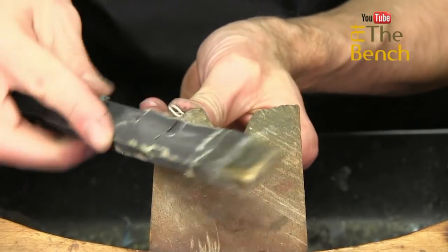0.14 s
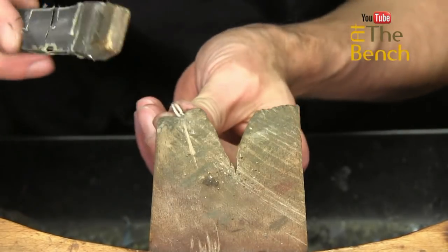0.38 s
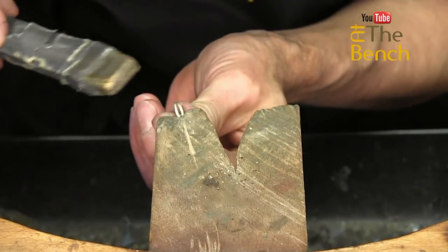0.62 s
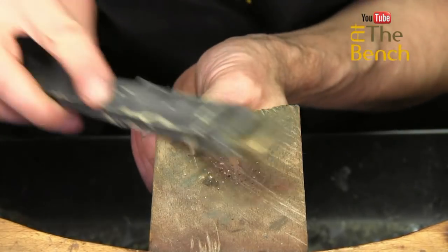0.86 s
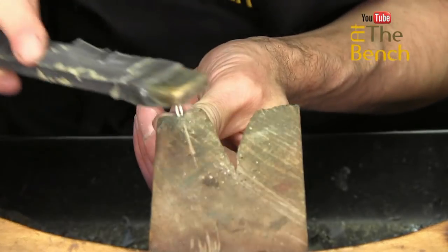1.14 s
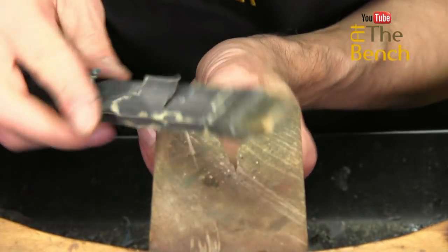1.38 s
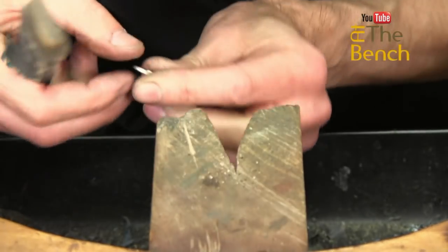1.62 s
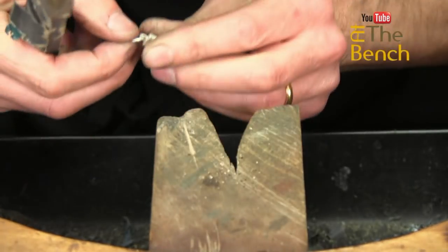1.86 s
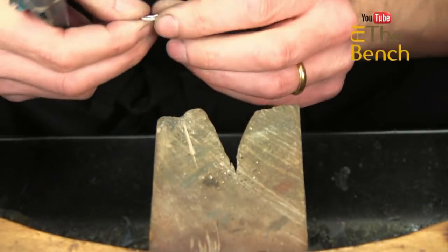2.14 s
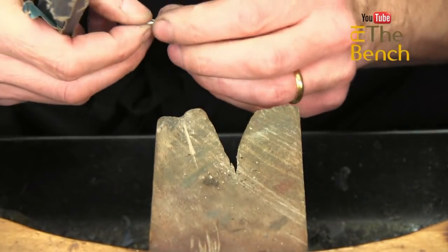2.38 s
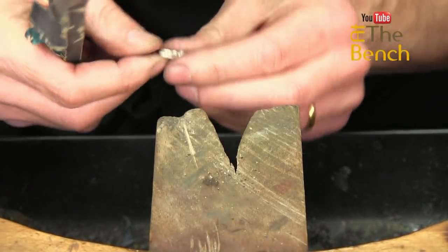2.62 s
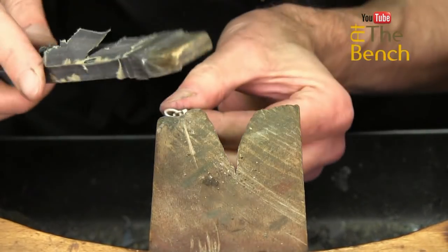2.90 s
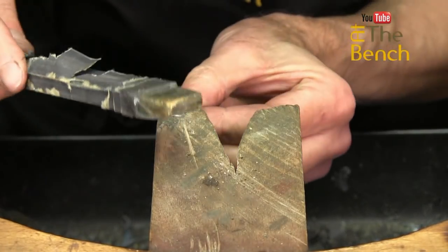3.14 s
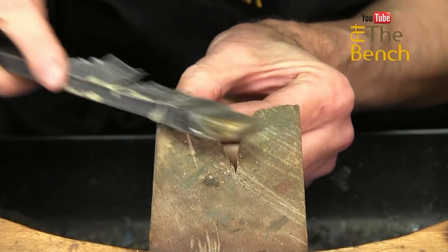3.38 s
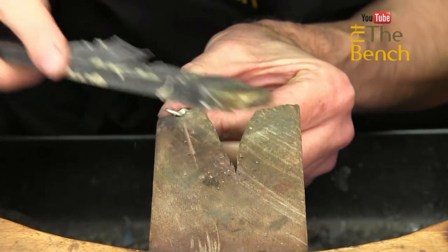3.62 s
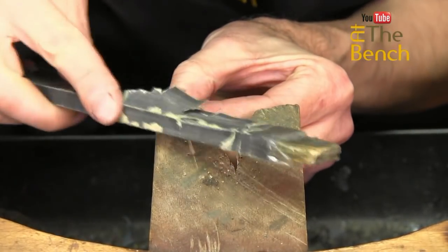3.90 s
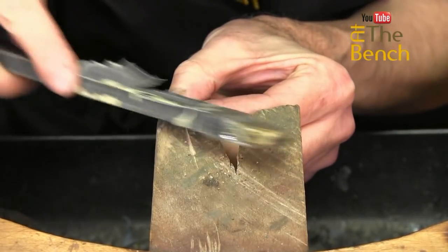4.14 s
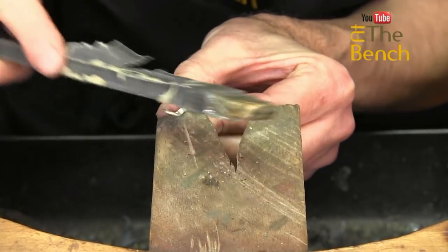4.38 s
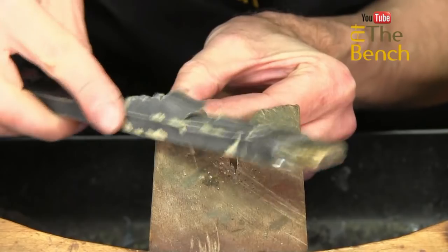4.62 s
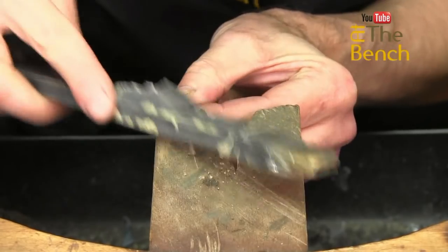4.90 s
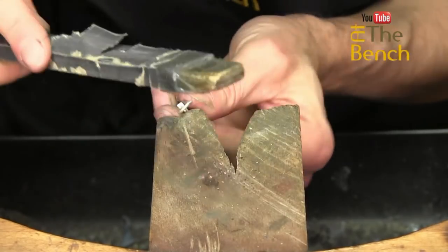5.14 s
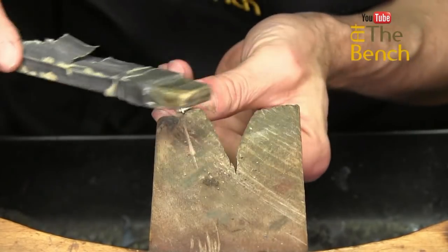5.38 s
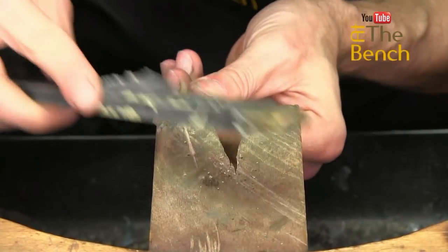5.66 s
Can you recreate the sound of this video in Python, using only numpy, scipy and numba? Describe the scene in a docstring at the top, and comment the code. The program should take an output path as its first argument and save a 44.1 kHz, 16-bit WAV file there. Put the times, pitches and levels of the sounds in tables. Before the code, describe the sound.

Dry, bright sandpaper hisses start almost at once, with woody knocks from the peg underneath and gaps between them. A quiet interval follows: skin rustles, little bumps on wood, sharp tiny clicks of metal. Then brisk back-and-forth rasping fills the rest, ringing slightly and shaking the wood. Single close microphone, small room, low steady background tone.

```python
"""At a bench in a small quiet workshop, one microphone: faint room tone throughout, rustling and bumping fingers first.
From 0.1 s a stick wrapped in abrasive paper is pushed over a small metal piece on a wooden peg:
knocks are struck wood modes with a noisy crack, strokes are clicking grit that hisses, rings and shakes the wood.
From 1.7 s fingers turn the piece over, with brushed-grain rustles, nudged wood and ticks of short rough ring.
From 3.5 s to the end the stick works again, with more knocks and slaps; a diffuse noise echo follows."""
import sys
import numpy as np
from scipy import signal
from scipy.fft import rfft, irfft
from scipy.io import wavfile
from numba import njit

SR = 44100
rng = np.random.default_rng(int(sys.argv[2]) if len(sys.argv) > 2 else 0)


def gain_from_db(level_db):
    """Turn a decibel level (scalar or array-like) into a linear amplitude factor."""
    decades = np.asarray(level_db, float) / 20
    return 10 ** decades


def digitize_waveform(pressure):
    """Quantize a signal to 16-bit integers and store it at the path in sys.argv[1].

    Rows of a 2-D input are taken as channels; values are limited to [-1, 1].
    """
    field = np.atleast_2d(pressure).T
    bounded = np.clip(field, -1, 1)
    quanta = np.round(bounded * 32767).astype(np.int16)
    wavfile.write(sys.argv[1], SR, quanta)


N = 254456

# room tone at the microphone, relative spectrum: (f/Hz, level/dB per Hz)
AIR_SPECTRUM = [(12, -44.5), (20, -1.5), (168, 0.5), (285, -10.5), (367, -8), (410, -8), (1090, -18),
                (1330, -21), (1480, -21.5), (2390, -23), (3440, -25), (13900, -29), (16000, -36)]
# skin and paper brushing: (start t/s, loudest t/s, end t/s, bright level/dB, dull part over bright level/dB)
RUSTLES = [(-.03, .0, 0.087, -61.5, 7.5), (.36, .39, 0.49, -50, -10), (.45, .52, 0.69, -56.5, -6.5),
           (.715, .755, 0.86, -54, -4), (.858, .878, 0.89, -60.5, 21.5), (1.08, 1.20, 1.32, -71, 17),
           (1.67, 1.72, 1.78, -58.5, -4), (1.775, 1.80, 1.93, -62, -3.5), (2.47, 2.50, 2.57, -68, -12),
           (2.70, 2.78, 2.83, -59, -6), (2.82, 2.965, 3.01, -47, -9), (3.0, 3.035, 3.17, -53.5, -14),
           (3.20, 3.265, 3.32, -54, -4.5)]
# relative spectrum of the bright rustle: (f/Hz, level/dB per Hz)
SKIN_SPECTRUM = [(1180, -34.5), (2000, -9), (3840, 2), (4150, 0.5), (8780, 3), (14500, -1.5), (16000, -18)]
# fingers bumping the wood: (start t/s, loudest t/s, end t/s, level/dB)
BUMPS = [(-.05, .03, .10, -61), (.74, .80, 0.82, -58.5), (1.12, 1.24, 1.3, -50), (1.78, 1.797, 1.8, -55),
         (2.07, 2.11, 2.174, -55), (2.19, 2.228, 2.30, -53.5), (3.07, 3.09, 3.13, -56),
         (3.11, 3.125, 3.15, -41), (3.24, 3.275, 3.4, -55.5)]
# modes of peg, stick and bench top: (f/Hz, level/dB, t60/s unless the contact damps it sooner)
WOOD_MODES = [(92.8, -17, 1), (145, -24.5, 0.94), (218.8, -3, 0.091), (280.1, -4.5, 0.12),
              (316.7, -2.5, 0.089), (348, -23, 1), (418, -8, 0.12), (503, -2.5, 0.04), (521.6, -9, 0.27),
              (684, -1.5, 0.032), (759, -11.5, 0.041), (910, -13, 0.14), (1100, -9, 0.17), (1140, -9, 0.23),
              (1337, -12, 0.13), (1774, -11, 0.035), (2261, -17.5, .03)]
# jointed wood splits each mode into close rings: (offset/share of f)
MODE_SPLIT = [-0.0235, 0, 0.0311]
# echo of the workshop: (f/Hz, t60/s, level/dB)
ROOM_ECHO = [(100, 0.88, -4), (400, 0.29, -10.5), (1420, 0.51, -4.5), (4900, 0.53, -16), (13000, 0.18, -10)]
# stick or knuckle on the peg, drives before their trims:
# (t/s, thud level/dB, crack level/dB, upper modes over thud level/dB, lowest modes over thud level/dB)
KNOCKS = [(0.101, -21, -30.5, 6, 3.5), (0.233, -5.5, -36, -7.5, -3), (0.894, -26, -37.5, 20, 8),
          (1.362, -26, -36.5, 13, 16.5), (3.469, -31, -41, 6, 6.5), (3.611, -27.5, -42, -2, 8),
          (3.631, -13, -21.5, 4.5, 2.5), (3.853, -13.5, -40, -5, -6.5), (4.029, -15, -34, -23, 0),
          (4.052, -13, -30, 2, 1), (4.224, -6, -30.5, -7, 2), (4.354, -19.5, -39, 3.5, -11),
          (4.388, -18, -46, 5.5, 7), (4.409, -12.5, -20.5, 3, 1.5), (4.572, -26.5, -34.5, 9.5, 11.5),
          (4.733, -19.5, -41, 1, 7), (4.76, -12, -21, 3.5, 5), (4.928, -27, -23.5, 13, -1),
          (4.934, -16, -36, 1.5, 6), (5.037, -14.5, -30.5, -6, 1.5), (5.048, -7, -16.5, 3, 0),
          (5.579, -38, -35, 9, 0), (5.587, -22, -48, -4, 7.5), (5.654, -21.5, -25, 3, 6),
          (5.661, -6, -38, -5, 1.5)]
# relative spectrum of the crack: (f/Hz, level/dB per Hz)
CRACK_SPECTRUM = [(530, -19), (900, -2.5), (4680, -1.5), (5820, -3.5), (8350, -3), (12300, -8.5),
                  (16000, -30)]
# passes of the grit: (touch t/s, fastest t/s, lift t/s, hiss when fastest level/dB, sag by the lift level/dB,
# ring over hiss level/dB, wood shudder over hiss level/dB, before the trims of its two parts)
STROKES = [(.108, .150, 0.24, -39, 1.5, -11, 0), (.243, .250, 0.31, -43, 10, -6.5, 5.5),
           (.900, .995, 1.071, -32.5, 13, -12.5, -2), (1.368, 1.430, 1.474, -35, 4.5, -15, 0),
           (1.515, 1.535, 1.555, -54.5, 2, -11, 5), (1.558, 1.576, 1.592, -46, 25, 4, -6.5),
           (1.608, 1.630, 1.663, -42, 16, -8, -8.5), (3.476, 3.560, 3.606, -35.5, 4, -4, -0.5),
           (3.606, 3.622, 3.631, -35, 0, -1.5, 1), (3.640, 3.645, 3.653, -42, 6, -10, 8.5),
           (3.860, 3.955, 4.012, -34, 3.5, -5.5, 1), (4.233, 4.300, 4.408, -35, 4.5, -2, 1),
           (4.422, 4.428, 4.465, -46.5, 4.5, -12, 6.5), (4.580, 4.675, 4.758, -34.5, 7, -1.5, 0),
           (4.938, 4.975, 5.025, -36.5, 5, -1.5, 1), (5.026, 5.036, 5.07, -33.5, 0.5, 2.5, -2),
           (5.582, 5.630, 5.66, -32, -2.5, -8, -2), (5.668, 5.680, 5.76, -35.5, 4, 2, 2.5)]
# relative spectrum of the hiss: (f/Hz, level/dB per Hz)
GRIT_SPECTRUM = [(1410, -52), (2400, -0.5), (2730, 1), (3710, 4.5), (4750, 1.5), (7770, -1.5), (15000, -3),
                 (16000, -35.5)]
# short ticks and small knocks, from low wooden pulses to high metallic rings:
# (t/s, sine at onset level/dB, f/Hz, t60/s, click before its filter over sine level/dB)
TICKS = [(0.4983, -46.5, 11500, 0.013, -6), (1.9557, -58, 4840, 0.028, 13.5),
         (2.0475, -55, 9300, 0.016, -9), (2.0777, -46.5, 9160, 0.015, -2),
         (2.0984, -28.5, 9800, 0.011, -3.5), (2.167, -43.5, 9700, 0.018, -18),
         (2.1754, -47, 9500, 0.015, 0), (2.2283, -31, 8740, 0.02, -16), (2.098, -41.5, 596, 0.018, -10),
         (2.312, -39.5, 1020, 0.014, 1), (2.313, -46, 3300, 0.006, -10), (2.822, -35, 134, 0.036, -30),
         (3.232, -54, 1070, 0.06, -20), (3.271, -53, 1070, 0.06, -15), (3.03, -48, 1050, 0.055, -20),
         (4.206, -50, 11000, 0.012, 5), (2.4782, -48, 10100, 0.0081, 6), (2.5, -52, 6300, 0.012, -5),
         (2.6975, -64, 3730, 0.014, 0), (4.4643, -29.5, 3830, 0.0099, -1)]

FLAT_FROM_S = 3.0   # the stick works on its tip before this time and is held flat after it


def rms_one(x):
    """Scale to rms 1."""
    return x / np.sqrt(np.mean(x ** 2) + 1e-20)


def colour(x, spectrum):
    """Give a near-white signal a smooth spectrum; rms 1."""
    hz = np.fft.rfftfreq(len(x), 1 / SR) + 1
    point_hz, point_db = np.transpose(spectrum)
    gain = gain_from_db(np.interp(np.log(hz), np.log(point_hz), point_db))
    return rms_one(irfft(rfft(x) * gain, len(x)))


def drift(rate_hz):
    """Slow chance of rms 1: noise through two equal low-pass poles."""
    r = np.exp(-2 * np.pi * rate_hz / SR)
    slow = signal.lfilter([1], [1, -2 * r, r * r], rng.standard_normal(N + SR))
    return rms_one(slow[SR:])   # the first second lets the filter settle


def grains(per_s, spread_db, clump_db):
    """Dense random clicks of uneven size that come in clumps."""
    sizes = gain_from_db(spread_db * np.minimum(rng.exponential(1, N), 4) + clump_db * drift(67))
    present = rng.random(N) < per_s / SR
    return rms_one(sizes * rng.choice([-1, 1], N) * present)


def ring(force, hz, t60):
    """A damped mode: a unit click sets a sine of height about 1 ringing."""
    r, w = gain_from_db(-60 / (max(t60, .002) * SR)), 2 * np.pi * hz / SR
    return signal.lfilter([0, np.sin(w)], [1, -2 * r * np.cos(w), r * r], force + 1e-18)


def wood(force_of, longest_s, low_hz=0, high_hz=SR):
    """Every mode is a small cluster of close rings, each pushed by force_of(index, Hz)."""
    out = np.zeros(N)
    for k, (hz, db, t60) in enumerate(WOOD_MODES):
        if not low_hz < hz < high_hz:
            continue
        for j, share in enumerate(MODE_SPLIT):
            force = force_of(k * len(MODE_SPLIT) + j, hz)
            out += gain_from_db(db) * ring(force, hz * (1 + share), min(t60, longest_s))
    return out


def swells(contacts, lift_s):
    """Summed gain of contacts, each a list of (s, dB) corners, and how far the current one has run (0-1)."""
    t, level, progress = np.arange(N) / SR, np.zeros(N), np.zeros(N)
    for corners in contacts:
        s, db = np.transpose(corners)
        touch = np.interp(t, [s[0] - lift_s, s[0], s[-1], s[-1] + lift_s], [0, 1, 1, 0])
        level += touch * gain_from_db(np.interp(t, s, db))
        progress = np.where(t > s[0] - lift_s, np.interp(t, s[[0, -1]], [0, 1]), progress)
    return level, progress


def room_tone():
    """Steady coloured noise of the quiet workshop, its level wandering slowly."""
    return gain_from_db(-57.5 + 1.0 * drift(0.63)) * colour(rng.standard_normal(N), AIR_SPECTRUM)


def brush(start, loudest, end, db):
    """A light contact swells and fades, from and to 13 dB below its loudest."""
    return [(start, db - 13), (loudest, db), (end, db - 13)]


def handling():
    """Dry skin and paper brush each other in fine clumped grains; fingers nudge the wood."""
    level, _ = swells([brush(a, b, c, db) for a, b, c, db, _ in RUSTLES], lift_s=0.029)
    muffled, _ = swells([brush(a, b, c, db + dull_db) for a, b, c, db, dull_db in RUSTLES], lift_s=0.025)
    nudging, _ = swells([brush(*row) for row in BUMPS], lift_s=0.031)
    uneven = gain_from_db(2.0 * drift(26))
    bright = colour(grains(per_s=6000., spread_db=1.5, clump_db=1.8), SKIN_SPECTRUM)
    dull_band = signal.butter(2, [500, 2500], "band", fs=SR, output="sos")
    dull = rms_one(signal.sosfilt(dull_band, rng.standard_normal(N)))
    nudge = rng.standard_normal(N)
    bumps = rms_one(wood(lambda k, f: nudge, longest_s=.2, low_hz=250, high_hz=330))
    return uneven * (level * bright + muffled * dull) + nudging * bumps


def workshop(x):
    """Diffuse echo: octave bands of noise, each dying at its own rate, cut off after a second."""
    t, tail = np.arange(SR) / SR, 0
    point_hz, point_t60, point_db = np.transpose(ROOM_ECHO)
    for low in 50 * 2. ** np.arange(9):
        band = signal.butter(2, [low, min(2 * low, .45 * SR)], "band", fs=SR, output="sos")
        middle = np.log(np.sqrt(2) * low)
        t60 = np.interp(middle, np.log(point_hz), point_t60)
        db = np.interp(middle, np.log(point_hz), point_db)
        fade = gain_from_db(-60 * t / t60) * np.minimum(t / 0.015, 1)   # builds up over 15 ms
        noise = signal.sosfilt(band, rng.standard_normal(SR))
        tail = tail + gain_from_db(db) * noise * fade / np.linalg.norm(fade)
    return signal.fftconvolve(x, tail)[:N]


def grip_db(hz, s):
    """The flat stick frees its own pair of modes near 1.1 kHz; the tip drives the highest modes."""
    return np.where(s > FLAT_FROM_S, 2.5 * (1000 < hz < 1200), 5 * (hz > 1500))


def knocks():
    """A soft push rings every wood mode with its own strength, and the whole bench nods under it."""
    s, thud_db, _, upper_db, lowest_db = np.transpose(KNOCKS)
    at = np.round(s * SR).astype(int)
    chance = rng.standard_normal((len(at), 2, len(WOOD_MODES) * len(MODE_SPLIT)))

    def force_of(k, hz):
        """One push a knock; where it lands tilts it toward upper or lowest modes."""
        force = np.zeros(N)
        tilt_db = upper_db * (hz > 800) + lowest_db * (hz < 290) + grip_db(hz, s)
        sign = np.sign(chance[:, 1, k // len(MODE_SPLIT)] - .3)
        force[at] = sign * gain_from_db(thud_db - 15 + 2.0 * chance[:, 0, k] + tilt_db)
        return force

    push = np.zeros(N)
    push[at] = -gain_from_db(thud_db - 13.5)
    # the stick's mass on the springy peg gives one dead thump under the rings
    thuds = wood(force_of, longest_s=1) + ring(push, 414.0, 0.023)
    contact = np.hanning(int(0.00074 * SR))   # a soft touch rounds the push
    thuds = np.convolve(thuds, contact / contact.sum())[:N]
    # the thuds carry little deep bass
    thuds = signal.sosfilt(signal.butter(2, 145, "high", fs=SR, output="sos"), thuds)
    return thuds + gain_from_db(-17) * ring(push, hz=52, t60=0.21)


def cracks():
    """Hard edges meeting: a burst that swells in under a millisecond, dies fast and leaves a duller tail."""
    s, _, crack_db = np.transpose(KNOCKS)[:3]
    burst = np.zeros(N)
    burst[np.round(s * SR).astype(int)] = gain_from_db(crack_db + 4.5)
    swell = np.exp(-1 / (0.00034 * SR))
    burst = signal.lfilter([1 - swell], [1, -swell], burst) / (1 - swell)

    def dying(t60):
        """The burst smeared into an exponential decay."""
        return signal.lfilter([1 - swell], [1, -gain_from_db(-60 / (t60 * SR))], burst)

    snap, sheen, tail = dying(.03), dying(.15), dying(.35)   # the treble dies sooner than the dull tail
    noise = colour(rng.standard_normal(N), CRACK_SPECTRUM)
    dull = signal.sosfilt(signal.butter(2, 4500, fs=SR, output="sos"), noise)
    return (snap + gain_from_db(-27.5) * sheen) * noise + gain_from_db(-16) * tail * dull


@njit
def moving_resonance(x, hz, width_hz, rate):
    """Two-pole resonance whose centre changes every sample."""
    y, r = np.zeros_like(x), np.exp(-np.pi * width_hz / rate)
    for i in range(2, len(x)):
        turn = 2 * r * np.cos(2 * np.pi * hz[i] / rate)
        y[i] = x[i] - x[i - 2] + turn * y[i - 1] - r * r * y[i - 2]
    return y


def stroke(touch, fastest, lift, db, sag_db):
    """A pass lands light, bites, peaks with the speed and sags."""
    full_bite_s = 0.028
    bite = min(full_bite_s, (fastest - touch) / 2)
    share = bite / full_bite_s   # a hurried pass lands nearer its peak
    return [(touch, db - 11.5 * share), (touch + bite, db - 4.5 * share), (fastest, db), (lift, db - sag_db)]


def patchy(x):
    """Worn and fresh paper: four bands that add up to the whole waver apart; the tip is duller."""
    lows = [signal.sosfiltfilt(signal.butter(1, hz, fs=SR, output="sos"), x) for hz in (3200, 5500, 9500)]
    bands = np.diff([0 * x] + lows + [x], axis=0)
    on_tip = np.arange(N) / SR < FLAT_FROM_S
    out = np.zeros(N)
    for k, band in enumerate(bands):
        tip_tilt_db = 0.4 * on_tip * (1.5 - k)
        out += gain_from_db(1.1 * drift(13) + tip_tilt_db) * band
    return out


def sanding():
    """Grit tears at the metal: a hiss, a ring that moves along the stick, and a shudder in the wood."""
    lift_s = 0.014
    level, along = swells([stroke(*row[:5]) for row in STROKES], lift_s)
    ringing, _ = swells([stroke(a, b, c, db + ring_db, sag) for a, b, c, db, sag, ring_db, _ in STROKES], lift_s)
    shaking, _ = swells([stroke(a, b, c, db + wood_db, sag) for a, b, c, db, sag, _, wood_db in STROKES], lift_s)
    grit = grains(per_s=11000.0, spread_db=2.0, clump_db=2.)
    hiss = patchy(colour(grit, GRIT_SPECTRUM))
    # the ring climbs along each pass and is favoured halfway
    ring_hz = 7260 + 1100 * along
    sing = rms_one(moving_resonance(grit, np.clip(ring_hz, 2000, 15000), 3300.0, SR))
    ringing = ringing * gain_from_db(6.5 * (np.sin(np.pi * along) - .5) + 2.4 * drift(22))
    # proud grains whistle around the ring, wandering in pitch and level
    wander_hz = np.clip(ring_hz * (1 + 0.27 * drift(27)), 2000, 15000)
    whistle = rms_one(moving_resonance(grit, wander_hz, 350., SR)) * gain_from_db(6.0 * drift(30))
    # the hand damps the wood while it presses
    shudder = grains(per_s=3500.0, spread_db=0.0, clump_db=1.5)
    t = np.arange(N) / SR
    rumble = rms_one(wood(lambda k, f: shudder * (-1) ** k, 0.038, high_hz=800))
    drone = rms_one(wood(lambda k, f: shudder * (-1) ** k * gain_from_db(grip_db(f, t) / 2), 0.025, low_hz=800))
    lumps = gain_from_db(2 * drift(36))
    shaken = shaking * lumps * (gain_from_db(1.5) * rumble + gain_from_db(-1.5) * drone)
    return level * hiss + ringing * (sing + gain_from_db(-19) * whistle) + shaken


def ticks():
    """Each tick is a short ring, part sine and part narrow noise, on a broad click."""
    out, t = np.zeros(N), np.arange(SR // 10) / SR
    for s, db, hz, t60, click_db in TICKS:
        at = round(s * SR)
        hiss, rough = rng.standard_normal((2, len(t)))
        near = signal.butter(2, [hz * .93, hz * 1.08], "band", fs=SR, output="sos")
        tone = np.sin(2 * np.pi * hz * t) + 0.77 * rms_one(signal.sosfilt(near, rough))
        tone = tone * gain_from_db(-60 * t / max(t60, .002))
        broad = signal.butter(2, [600, min(4.5 * hz, 16000)], "band", fs=SR, output="sos")
        click = gain_from_db(click_db - 60 * t / 0.011) * signal.sosfilt(broad, hiss)
        out[at:at + len(t)] += gain_from_db(db) * (tone + click)
    return out


def scene():
    """Bench sounds, their echo and the room tone; the ticks reach the echo more weakly than the rest."""
    bench, small = handling() + knocks() + sanding(), ticks()
    echo = workshop(bench + gain_from_db(-4.5) * small)
    return (room_tone() + bench + small + echo + cracks())[None]


def low_pass(x):
    """Removes everything above the highest recorded frequency."""
    return signal.sosfilt(signal.butter(12, 16530, fs=SR, output="sos"), x)


def record(dry):
    """One microphone that loses the deep bass and rounds the loudest peaks."""
    thin = signal.sosfilt(signal.butter(2, 45, "high", fs=SR, output="sos"), dry)
    rounded = .85 * np.tanh(thin / .85)
    return low_pass(rounded)


dry = scene()
out = record(dry)
digitize_waveform(out)
```